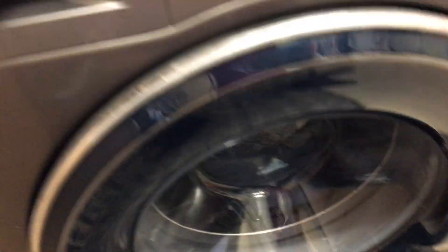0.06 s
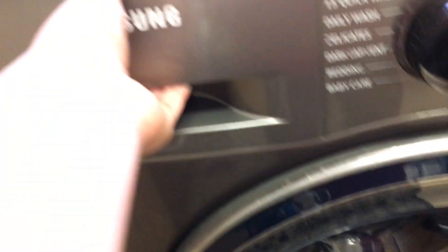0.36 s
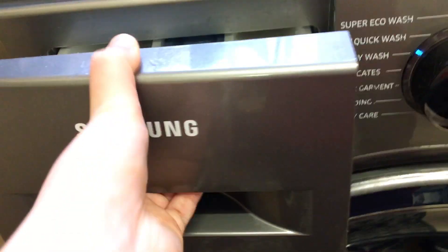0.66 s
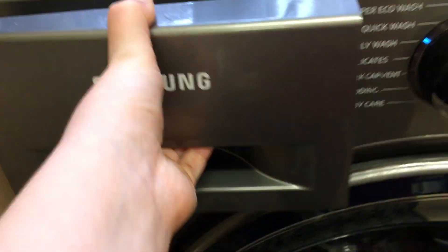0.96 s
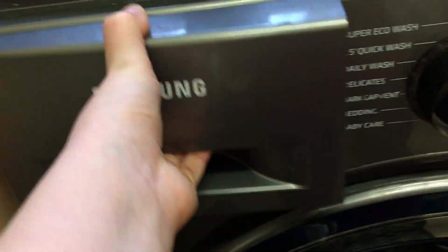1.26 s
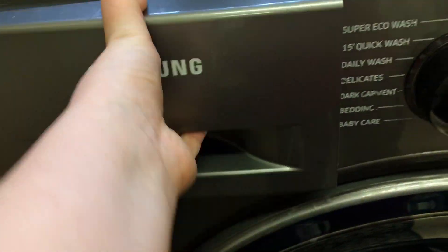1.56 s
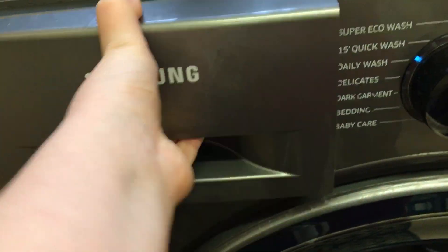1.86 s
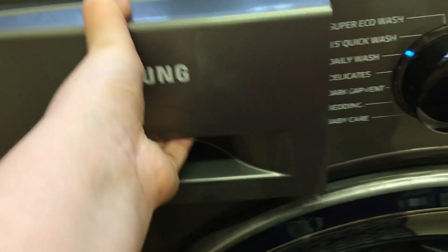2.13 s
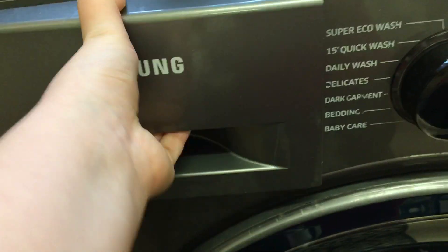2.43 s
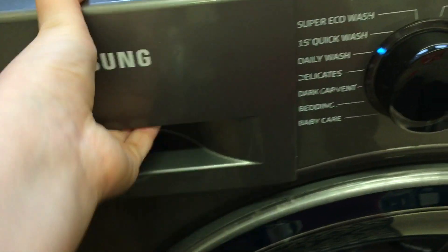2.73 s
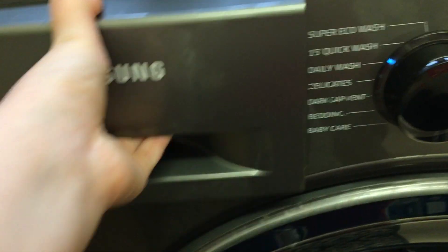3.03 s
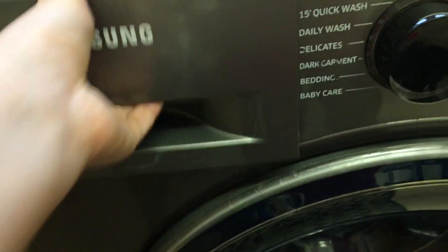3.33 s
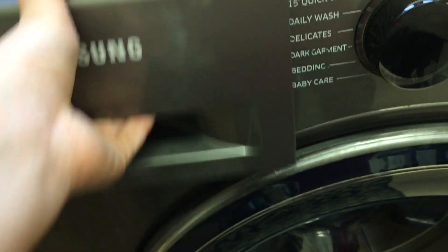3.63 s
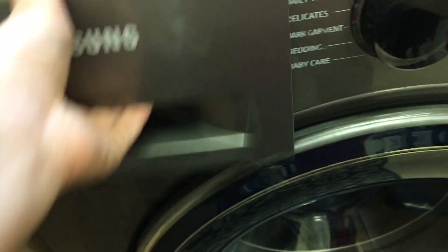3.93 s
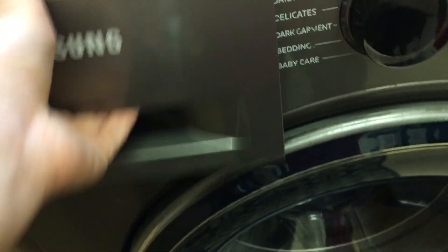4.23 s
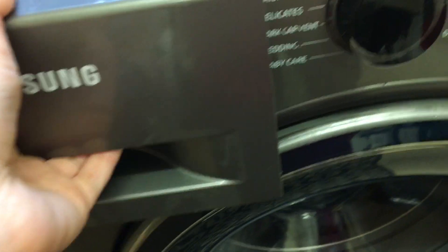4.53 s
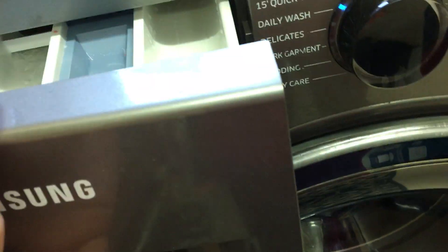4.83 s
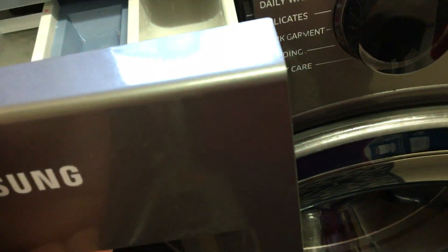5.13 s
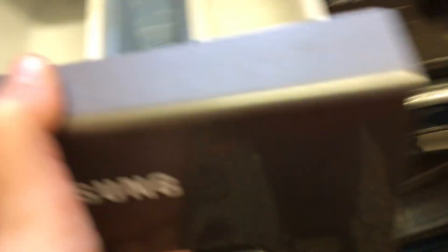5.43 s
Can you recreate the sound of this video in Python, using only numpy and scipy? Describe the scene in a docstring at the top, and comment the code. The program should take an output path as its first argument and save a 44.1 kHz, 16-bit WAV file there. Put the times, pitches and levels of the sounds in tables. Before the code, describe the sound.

A low, steady hush of a small room lies under a plastic washing machine drawer, heard close up. At about 0.5 seconds a cluster of hollow knocks sounds as the drawer bumps its housing, followed by soft scrapes and a tiny squeak. From 1.2 to 1.6 seconds it judders, and the sliding grows louder. Until about 4.4 seconds it is pushed and pulled in gritty, hissy scraping strokes, roughly three a second, over a low rumble from the runners, with irregular knocks throughout. The sharpest knocks snap at around 3.5 seconds, and more bunch up between 3.8 and 4.5. The scraping and rumble then fall away, leaving light ticks from 4.6 to 5.4 seconds and a very faint, thin, sinking squeak after 5. At 5.5 seconds a softer scrape returns, with one last dull knock near 5.7.

```python
"""Hollow plastic knocks come first: a washing machine's detergent drawer bumps its housing as a hand
works it to and fro in a small room. It judders going in askew and rumbles on its runners, and each
stroke has a gritty, rushing scrape of plastic sticking and slipping on plastic. Pulled right out,
the drawer settles with light ticks and a faint squeak, then scrapes again."""
import sys
import numpy as np
from scipy import signal
from scipy.fft import rfft, irfft, next_fast_len
from scipy.io import wavfile
from scipy.ndimage import uniform_filter1d

SR = 44100
rng = np.random.default_rng(int(sys.argv[2]) if len(sys.argv) > 2 else 0)


def waveform_to_disk(signal):
    """Save audio, clipped to [-1, 1], as 16-bit WAV at the path in sys.argv[1]."""
    frames = np.transpose(np.atleast_2d(signal))
    scaled = np.clip(frames, -1, 1) * 32767
    samples = np.round(scaled).astype(np.int16)
    wavfile.write(sys.argv[1], SR, samples)


N = 250929
TIME = np.arange(N) / SR

# drawer hits on the housing: (time [s], strength [dB], pitch of the spot [Hz], treble loss [dB/octave])
KNOCKS = [(0.504, -47, 146, 14), (0.546, -37, 159, 18), (0.561, -37, 159, 7.5), (0.571, -37.5, 149, 6.5),
          (0.597, -36, 124, 10.5), (0.643, -35, 525, 17), (0.734, -50.5, 200.0, 39), (0.761, -50, 314, 19),
          (0.855, -45.5, 236, 28), (0.909, -46, 160.0, 9.5), (1.001, -42.0, 131, 18),
          (1.063, -39.5, 480.0, 15.5), (1.245, -39, 213, 39), (1.313, -34.5, 680, 18),
          (1.382, -45.5, 300.0, 20), (1.448, -41.5, 620.0, 13.0), (1.49, -41.5, 270.0, 12),
          (1.512, -43.5, 253, 7), (1.616, -39.5, 134, 19), (1.652, -42, 160.0, 8),
          (1.732, -38.5, 131, 10.5), (1.748, -32.5, 630, 9.5), (2.026, -38.5, 134, 9.5),
          (2.069, -34, 567, 25), (2.218, -43.5, 170.0, 10), (2.336, -33, 654, 15), (2.506, -34.5, 337, 7),
          (2.583, -33.5, 161, 8.0), (2.607, -38, 130.0, 8), (2.793, -34.5, 160.0, 9), (2.872, -35, 970, 10),
          (2.898, -34, 123, 9), (2.936, -41.5, 720.0, 15), (3.119, -37, 236, 8), (3.267, -40, 125, 8),
          (3.443, -24.5, 413, 6.5), (3.496, -36, 700.0, 24), (3.545, -30.5, 296, 2.5),
          (3.561, -36.5, 640.0, 19), (3.836, -39, 358, 15.0), (3.872, -32, 358, 10.5),
          (3.88, -31.5, 530, 9.5), (4.083, -34.5, 295, 7), (4.107, -38, 640.0, 9),
          (4.179, -33.5, 285.0, 10.5), (4.216, -36, 630, 17.0), (4.333, -46.5, 210.0, 26),
          (4.384, -35.5, 327, 6.0), (4.404, -37, 410.0, 10.5), (4.417, -38, 324, 6), (4.467, -34, 710, 13),
          (4.498, -36.5, 910, 4.5), (4.519, -33.0, 396, 15), (4.712, -52.5, 150.0, 6),
          (5.459, -56, 900.0, 7), (5.667, -41, 243, 19)]
# body resonances of drawer and housing: (pitch [Hz], width [Hz], relative level [dB])
DRAWER_MODES = [(107, 89, -6.5), (162.9, 13.8, -1), (184, 15.7, 0), (239.8, 23, -4), (295.6, 34.6, -4),
                (390.5, 53.5, -5), (454, 96, -7.5), (565.7, 14.3, -12.5), (657, 38.4, -3.5),
                (745.6, 48, -3.5), (888, 58, -6), (1186, 110, -10), (1364, 73, -3), (1670, 120, -6),
                (1980, 70, -7.5), (2207, 99, -9.5), (2519, 81, -9), (3460, 570, -4.5), (4240, 250, -9.5),
                (5850, 1200, -8), (7200, 1800, -14), (9040, 1600, -12.5), (12400, 1500, -10.5)]
# pushes and pulls of the hand: (start [s], end [s], hiss level [dB], rasp level [dB])
STROKES = [(0.465, 0.54, -71.5, -63.5), (0.534, 0.74, -62, -56), (0.773, 0.946, -63.5, -56.5),
           (0.97, 1.102, -64.5, -58.5), (1.187, 1.377, -52.5, -47.5), (1.358, 1.688, -50.5, -44.5),
           (1.687, 1.993, -49.5, -43.5), (1.975, 2.276, -51, -43.5), (2.26, 2.557, -50.5, -42.5),
           (2.557, 2.846, -52, -43.5), (2.837, 3.183, -51, -44), (3.17, 3.455, -51.5, -43.5),
           (3.457, 3.796, -52.5, -44.5), (3.783, 4.12, -51.5, -44.5), (4.132, 4.408, -51, -44),
           (4.417, 4.67, -61, -57), (4.678, 4.936, -62, -57), (4.965, 5.315, -69.5, -65),
           (5.323, 5.486, -76, -70.5), (5.488, 5.81, -58.5, -55)]
# EQ of the coarse layer of the scrape: (frequency [Hz], gain [dB])
RASP_EQ = [(400, -4.5), (700, -0.5), (1050, -6.5), (1400, -2), (1900, -4.5), (2500, -5.5), (2950, -6.5),
           (3300, -5.5), (3700, -6), (4200, -4.5), (4800, -17), (6000, -33)]
# EQ of the fine layer of the scrape: (frequency [Hz], gain [dB])
HISS_EQ = [(3500, -12), (4900, -3), (5600, 1), (6500, 1), (7600, -2), (9300, -2.5), (10400, -6.5),
           (11200, -4), (12200, -4), (13500, -6.5), (16000, -9.5)]
# weight on the runners, easing as the drawer comes out: (time [s], upper gain [dB], deep gain [dB])
RUMBLE_FADERS = [(0.44, -71, -72), (0.56, -48, -45), (0.85, -56, -43.5), (1.15, -53, -49),
                 (1.22, -39.5, -46.5), (2.2, -40.5, -43.5), (2.6, -39, -39.5), (3.7, -42.5, -40.5),
                 (4.45, -37.5, -35.5), (4.68, -53, -44), (4.95, -63, -60.5), (5.69, -67, -64)]
# EQ of the bumps on the runners: (frequency [Hz], gain [dB])
RUMBLE_EQ = [(25, -28), (35, -15), (48, 6), (70, -4), (100, 3.5), (140, -5), (190, 2), (260, 6),
             (350, -22.5), (520, -14.5), (700, -12), (950, -7), (1500, -36.5)]
# sharp snaps on the harder knocks, and light ticks of the pulled-out drawer:
# (time [s], relative peak [dB], pitch [Hz])
SNAPS_AND_TICKS = [(0.477, -41, 2190), (1.002, -30, 1530), (1.195, -37, 2920), (2.028, -29.5, 1800),
                   (3.445, -19, 3100), (3.547, -21, 3880), (4.386, -29, 3500), (4.404, -15.5, 1254),
                   (4.473, -31, 1480), (4.6127, -36, 2290), (4.625, -42, 3500), (4.658, -39, 1550),
                   (4.757, -35, 2200), (4.856, -38, 3400), (4.859, -38, 5570), (4.904, -44.5, 4170),
                   (4.922, -43, 1670), (5.024, -47.5, 9200), (5.0544, -47, 3200), (5.0758, -44, 1800),
                   (5.111, -49, 1710), (5.248, -40.5, 1270), (5.402, -55, 12500)]
# thin squeaks of a runner: (time [s], length [s], starting pitch [Hz], level [dB])
SQUEAKS = [(0.84, 0.13, 5900, -61), (5.05, 0.52, 6840, -76)]
# EQ of the room's steady background: (frequency [Hz], gain [dB])
ROOM_TONE_EQ = [(15, -41), (25, -9), (80, 4), (206, -15.5), (256, 3), (301, -11.5), (416, -9.5), (575, -18),
                (677, -30), (1100, -27), (2220, -28), (5000, -34), (10700, -38.5), (14000, -40),
                (16000, -52.5)]


def knocks(chatter_s=0.003826, snap_s=0.004, settle_s=0.029, hard_hz=3800, level_db=-2, size=8192):
    """Loose plastic strikes its housing and chatters briefly, ringing each mode at its own strength."""
    times, t = np.array(KNOCKS)[:, 0], np.arange(size) / SR
    hits = 0
    for k, (hz, width, mode_db) in enumerate(DRAWER_MODES):
        contact_s = snap_s if hz > hard_hz else chatter_s
        chatter = t / contact_s * np.exp(1 - 2 * t / contact_s)
        settling = from_db(-19) * np.exp(-t / settle_s)
        force = (chatter + settling) * rng.standard_normal((len(times), size))
        if hz < hard_hz:   # the blunt main strike misses the top modes
            force[:, round(contact_s * SR / 2)] += from_db(18) * (-1) ** k
        ring = resonate(butter(force, 2 * hz, "low"), hz, width)
        ring /= np.sqrt(np.sum(ring ** 2, axis=1, keepdims=True) / (0.023 * SR))   # as 23 ms at rms 1
        scatter_db = 1.5 * rng.standard_normal(len(times))
        hits = hits + ring * from_db(level_db + mode_db + blow_db(hz) + scatter_db)[:, None]
    return butter(place(times, hits), 54, "high")   # a small drawer radiates little bass


def blow_db(hz, spot_octaves=0.58, dull_from_hz=1570, dull_to_hz=8040):
    """Each blow's drive on one mode: strongest near the pitch of its spot, duller when it lands soft."""
    _, strength_db, spot_hz, softness = np.transpose(KNOCKS)
    octaves = np.log2(hz / spot_hz)
    spot_db = 7 * np.exp(-.5 * (octaves / spot_octaves) ** 2)
    bass_loss_db = 2.5 * np.maximum(-octaves, 0)   # lower modes are harder to excite
    treble_loss_db = softness * np.log2(np.hypot(1, min(hz, dull_to_hz) / dull_from_hz))
    return strength_db + spot_db - bass_loss_db - treble_loss_db


def runners(crossover_hz=124):
    """The sliding drawer catches on its rails in many soft bumps, which rumble and ring its low modes."""
    times, upper_db, deep_db = np.transpose(RUMBLE_FADERS)
    bumps = slips(per_s=110, spread_db=3) + from_db(-6) * rng.standard_normal(N)
    body = rms_one(butter(hollow(bumps, below_hz=830), [125, 520], "band"))
    rumble = from_db(1) * rms_one(colour(bumps, RUMBLE_EQ) + from_db(-3.5) * body)
    upper = from_db(np.interp(TIME, times, upper_db)) * butter(rumble, crossover_hz, "high", order=3)
    deep = from_db(np.interp(TIME, times, deep_db)) * butter(rumble, crossover_hz, "low", order=3)
    return upper + deep


def scrape(flutter_db=1.18):
    """Plastic rubs on plastic: a hollow rasp under a finer hiss, fluttering with the hand's speed."""
    _, _, hiss_db, rasp_db = np.transpose(STROKES)
    flutter = from_db(flutter_db * drift(50))
    coarse = friction(band_hz=(450, 5500), decay_s=0.0038, smooth_db=4.5, patchy_db=3, per_band=600)
    catches = colour(slips(per_s=1400, spread_db=1), RASP_EQ)
    rasp = rms_one(colour(coarse, RASP_EQ) + from_db(-3.5) * hollow(catches, below_hz=2900))
    fine = friction(band_hz=(3600, 16200), decay_s=0.0017, smooth_db=1.5, patchy_db=2, per_band=900)
    hiss = colour(fine, HISS_EQ)
    return flutter * (hand_strokes(rasp_db, turn_db=-3) * rasp + hand_strokes(hiss_db, turn_db=-7) * hiss)


def friction(band_hz, decay_s, smooth_db, patchy_db, per_band, bands=14, size=512):
    """Tiny contacts stick, slip and ring over a smooth noise bed; the grip wanders from band to band."""
    edges, t = np.geomspace(*band_hz, bands + 1), np.arange(size) / SR
    out = 0
    for low, high in zip(edges, edges[1:]):
        when, pitch, strength = rng.random((3, per_band, 1))
        hz = low + pitch * (high - low)
        rings = from_db(10.7 * strength ** 3) * np.sin(2 * np.pi * hz * t) * np.exp(-t / decay_s)
        positions = (when * N).astype(int) + np.arange(size)
        grains = rms_one(np.bincount(positions.ravel(), rings.ravel(), N)[:N])
        bed = rms_one(butter(rng.standard_normal(N), [low, high], "band"))
        grip = from_db(patchy_db * drift(14.4))
        out = out + np.sqrt(high - low) * grip * (grains + from_db(smooth_db) * bed)
    return out


def hand_strokes(levels_db, turn_db, grip_s=0.066):
    """Envelope of a scrape layer: each stroke speeds up and slows along a half sine, dipping at turns."""
    gain = np.zeros(N)
    for (start, end, *_), db in zip(STROKES, levels_db):
        phase = (TIME - start) / (end - start)
        during = (phase >= 0) & (phase < 1)
        speed = np.sin(np.pi * phase[during])
        gain[during] = from_db(db + turn_db * (1 - speed))
    return uniform_filter1d(gain, round(grip_s * SR))   # the hand takes up and eases its pressure


def judder(start_s=1.205, end_s=1.56, level_db=-44.5):
    """The drawer goes in askew: quick stick and slip swells and fades, ringing its middle modes."""
    swell = np.sin(np.pi * np.clip((TIME - start_s) / (end_s - start_s), 0, 1))
    body = hollow(slips(per_s=480, spread_db=6), below_hz=2400)
    return from_db(level_db) * swell * rms_one(butter(body, 750, "high"))


def slips(per_s, spread_db):
    """Sticking plastic lets go in tiny random clicks of uneven size; rms 1."""
    at = np.flatnonzero(rng.random(N) < per_s / SR)
    sizes = from_db(spread_db * np.minimum(rng.exponential(1, len(at)), 3))
    out = np.zeros(N)
    out[at] = sizes * rng.choice([-1, 1], len(at))
    return rms_one(out) + 1e-18


def hollow(force, below_hz):
    """The drawer's boxy body: a force rings its modes below a given pitch; rms 1."""
    return rms_one(sum(from_db(db) * (-1) ** k * resonate(force, hz, width)
                       for k, (hz, width, db) in enumerate(DRAWER_MODES) if hz < below_hz))


def snaps_and_ticks(trim_db=-3):
    """Sharp snaps on the harder knocks, and light ticks of the pulled-out drawer."""
    clicks = [from_db(db + trim_db) * tick(hz, decay_s=0.0047) for _, db, hz in SNAPS_AND_TICKS]
    return place(np.array(SNAPS_AND_TICKS)[:, 0], np.array(clicks))


def tick(hz, decay_s, relative_width=0.28, size=2048):
    """One brief contact: a noise burst narrowed to a short, bright ring; peak 1."""
    ring = rng.standard_normal(size) * np.exp(-np.arange(size) / SR / decay_s)
    for _ in range(2):
        ring = resonate(ring, hz, relative_width * hz)
    return ring / np.abs(ring).max()


def squeaks(sag_hz_per_s=1800, wander_hz=170):
    """The creeping drawer draws thin, unsteady squeaks from a runner, each sinking in pitch."""
    out = np.zeros(N)
    for start, length, hz, db in SQUEAKS:
        age = np.clip(TIME - start, 0, length)
        pitch = hz - sag_hz_per_s * age + wander_hz * drift(49)
        envelope = from_db(db) * np.sin(np.pi * age / length) * drift(120)
        out += envelope * np.sin(2 * np.pi * np.cumsum(pitch) / SR)
    return out


def grit(start_s=4.9, end_s=5.42, peak_db=-89, spread_db=15, fade_db_per_s=13, count=64):
    """Fine grains crackle very faintly and die away as the drawer hangs on its last bit of rail."""
    when, pitch, strength = rng.random((count, 3)).T
    after_s = when * (end_s - start_s)
    gains = from_db(peak_db - fade_db_per_s * after_s - spread_db * (1 - strength ** 2))
    pitches_hz = 4860 * 2 ** (1.4 * pitch)
    cracks = [gain * tick(hz, decay_s=0.0013) for gain, hz in zip(gains, pitches_hz)]
    return place(start_s + after_s, np.array(cracks))


def room(x, t60_s=0.13, wall_hz=4500, wet_db=-12, first_echo_s=0.0077):
    """Close walls add a short, dull tail."""
    t = TIME[:SR // 2]
    envelope = from_db(-60 * t / t60_s) * np.clip(t / first_echo_s - 1, 0, 1)
    echoes = butter(rng.standard_normal(len(t)) * envelope, wall_hz, "low")
    echoes /= np.sqrt(np.sum(echoes ** 2) * SR / 2 / wall_hz)
    return x + from_db(wet_db) * signal.fftconvolve(x, echoes)[:N]


def room_tone(level_db=-64):
    """A low, steady hush fills the room."""
    return from_db(level_db) * colour(rng.standard_normal(N), ROOM_TONE_EQ)


def from_db(db):
    """Decibels to gain."""
    return 10 ** (np.asarray(db) / 20)


def rms_one(x):
    """Scale to rms 1."""
    return x / np.sqrt(np.mean(x ** 2) + 1e-20)


def butter(x, hz, kind, order=2):
    """Causal Butterworth filter."""
    return signal.sosfilt(signal.butter(order, np.clip(hz, 10, .47 * SR), kind, fs=SR, output="sos"), x)


def resonate(x, hz, width):
    """One resonance, gain 1 at its peak."""
    r = np.exp(-np.pi * width / SR)
    feedback = [1, -2 * r * np.cos(2 * np.pi * hz / SR), r * r]
    return signal.lfilter(np.array([1, 0, -1]) * (1 - r * r) / 2, feedback, x)


def drift(rate_hz, hop=40, run_in=2000):
    """Smooth random modulation of spread 1."""
    r = np.exp(-2 * np.pi * rate_hz * hop / SR)
    noise = rng.standard_normal(N // hop + run_in + 2)
    slow = signal.lfilter([1], [1, -2 * r, r * r], noise)[run_in:]
    return np.interp(np.arange(N) / hop, np.arange(len(slow)), rms_one(slow))


def colour(x, eq):
    """Shape a noise with an EQ curve that drops 60 dB in the octave beyond each end; rms 1."""
    hz, db = np.transpose(eq)
    size = next_fast_len(N)
    octaves = np.log2(np.arange(size // 2 + 1) * SR / size + 1)
    curve_db = np.interp(octaves, np.log2(np.r_[hz[0] / 2, hz, hz[-1] * 2]),
                         np.r_[db[0] - 60, db, db[-1] - 60])
    return rms_one(irfft(rfft(x, size) * from_db(curve_db), size)[:N])


def place(times, sounds):
    """Lay short sounds on the timeline."""
    out = np.zeros(N + 2 * sounds.shape[1])
    for s, sound in zip(times, sounds):
        start = max(round(s * SR), 0)
        out[start:start + len(sound)] += sound
    return out[:N]


def scene():
    """The drawer close up in mono over the room tone; only the short contacts get the reverb."""
    background = room_tone()
    contacts = room(knocks() + snaps_and_ticks() + grit())
    sliding = runners() + scrape() + judder() + squeaks()
    return (contacts + sliding + background)[None]


def record(dry, cutoff_hz=15900):
    """A steep low-pass takes the very top off the mix."""
    return signal.sosfilt(signal.ellip(12, .1, 80, cutoff_hz, fs=SR, output="sos"), dry)


dry = scene()
out = record(dry)
waveform_to_disk(out)
```